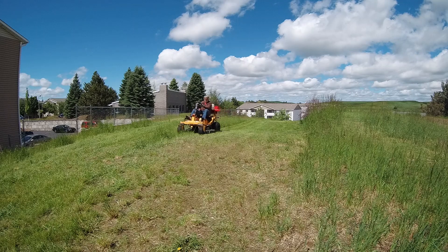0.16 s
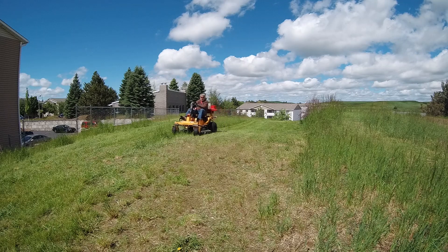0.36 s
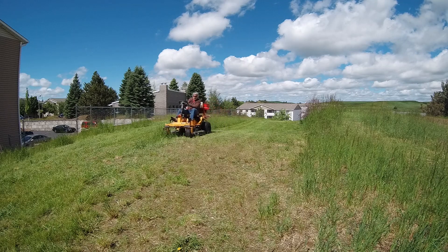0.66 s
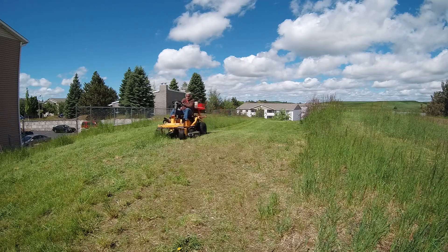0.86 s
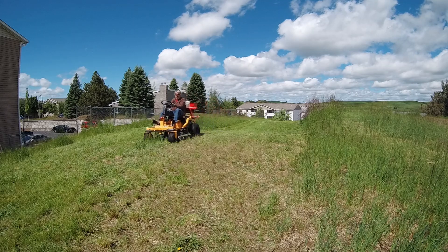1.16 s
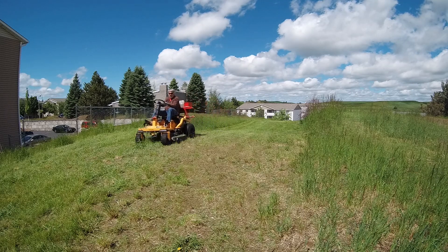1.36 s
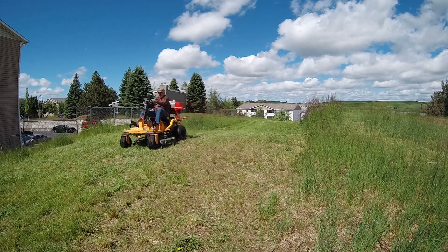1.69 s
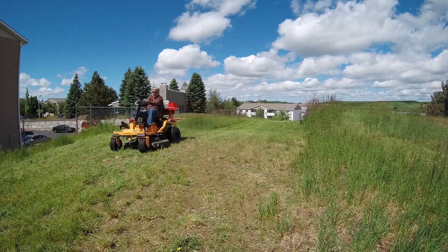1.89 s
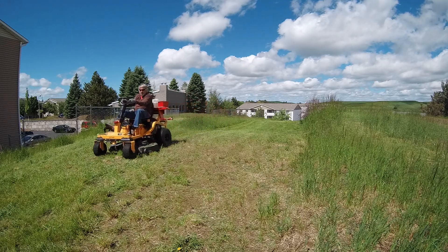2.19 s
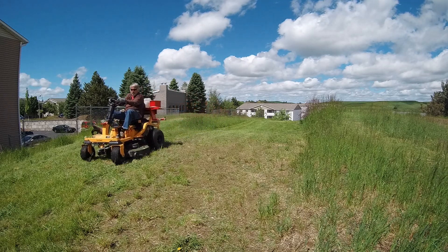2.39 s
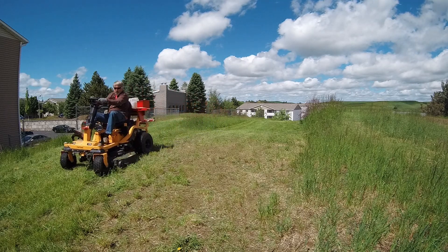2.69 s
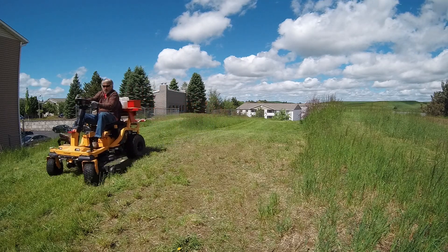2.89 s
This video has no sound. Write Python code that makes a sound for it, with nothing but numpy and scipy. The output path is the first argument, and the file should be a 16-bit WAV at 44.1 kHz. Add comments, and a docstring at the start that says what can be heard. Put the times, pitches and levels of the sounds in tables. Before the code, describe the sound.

A ride-on mower drones and roars steadily, growing louder as it approaches across tall grass.

```python
"""A field of tall grass: a ride-on mower comes from far off towards a stereo microphone.
Blades thump the air under the deck as partials of the blade rate; a twin engine drones as partials of
its cycle. Air roars in a puff per blade pass and cut grass hisses and patters, both from shaped noise.
Stalks and grit crack and knock on the deck now and then: short rings, each with a rough rattle."""
import sys
import numpy as np
from scipy import signal
from scipy.fft import rfft, irfft, next_fast_len
from scipy.io import wavfile
from scipy.ndimage import uniform_filter1d

SR = 44100
rng = np.random.default_rng(int(sys.argv[2]) if len(sys.argv) > 2 else 0)


def wav_out(sig):
    """Save sig, one row per channel (or a flat mono array), as 16-bit PCM at SR to the path in sys.argv[1]."""
    wavfile.write(sys.argv[1], SR, np.round(np.clip(np.atleast_2d(sig).T, -1, 1) * 32767).astype(np.int16))


def voltage_ratio(level):
    """Linear amplitude factor for a level in decibels (scalar or array-like)."""
    return 10 ** (np.asarray(level, float) / 20)


N = 134505  # samples, about 3.05 s

# Blade speed, sagging in thick grass and rising as the load eases: time_s, passes_per_s
BLADE_RATE = [(0, 86.1), (.4, 86.4), (.9, 87.8), (1.15, 87.5), (1.4, 86.5), (1.7, 87.3), (2.3, 88.3),
              (2.45, 89.1), (2.8, 90.0), (3.05, 90.3)]
# Partials of the blade thump: multiple_of_blade_rate, relative_level_db
BLADE_PARTIALS = [(2, 4.5), (3, 4), (4, -4.5), (5, -3), (6, -4), (7, -7), (8, -8.5), (9, -16.5), (10, -21)]
# Lowest blade partial, and how rough the upper ones are: time_s, level_db, roughness (a plain factor)
BLADE_FUNDAMENTAL = [(0, -59, 1.54), (.6, -53.5, 1.08), (1.3, -55, 1.09), (1.6, -54, 0.8), (2.3, -49, 0.51),
                     (3.05, -49.5, 0.68)]
# Deck sounds before the fixed offsets in air_roar() and grass_hiss():
# time_s, low_blade_db, upper_blade_db, roar_db, hiss_db
DECK_LEVELS = [(0, -49, -38, -34.5, -56), (.15, -46, -37.5, -33.5, -57), (.4, -47.5, -35, -33.5, -55.5),
               (.65, -45, -34, -31.5, -56.5), (.9, -42.5, -34.5, -31.5, -55),
               (1.16, -45, -33.5, -30.5, -54), (1.24, -40.5, -32.5, -27.5, -52.5),
               (1.39, -44.5, -31, -29.5, -51), (1.51, -46.5, -32, -29.5, -51.5),
               (1.86, -46.5, -30, -28.5, -52.5), (2.15, -47, -27.5, -26, -51), (2.33, -43, -27, -26.5, -52),
               (2.45, -41.5, -26.5, -25, -51.5), (2.7, -40, -27, -26.5, -52.5),
               (2.95, -43, -23, -25.5, -51.5), (3.05, -42.5, -25.5, -25.5, -51)]
# Engine speed: time_s, cycles_per_s
ENGINE_RATE = [(0, 25.1), (.7, 25.2), (1.0, 25.4), (1.5, 25.35), (2.2, 25.65), (2.8, 25.95), (3.05, 26.0)]
# Engine partials, some favoured by uneven twin firing: multiple_of_engine_cycle, relative_level_db
ENGINE_PARTIALS = [(4, -22), (5, -7), (6, -10.5), (8, -2.5), (9, -8.5), (11, -9.5), (12, -16.5), (13, -9),
                   (16, -7.5)]
# Engine drone gain: time_s, level_db
ENGINE_LEVEL = [(0, -44.5), (1, -46), (1.8, -43.5), (2.5, -43.5), (3.05, -42)]
# Spectrum shape of the roar of air and grass under the deck: frequency_hz, relative_level_db
ROAR_SHAPE = [(30, -61), (60, -40.5), (110, -26.5), (190, -13.5), (300, -8), (500, -1.5), (700, -1),
              (1050, -1.5), (1600, -11.5), (2500, -24.5), (3300, -43), (5500, -120)]
# Spectrum shape of the grass hiss: frequency_hz, relative_level_db
HISS_SHAPE = [(880, -35.5), (1500, -2.5), (2680, -9.5), (3690, -19.5), (4380, -19.5), (4990, -24.5),
              (5920, -38), (6860, -33.5), (7700, -47), (9200, -55), (9900, -71), (12500, -89.5)]
# Gain on the separate hiss noise that forms the side signal, strong in two bands: frequency_hz, gain_db
HISS_SIDE = [(2700, -72), (3050, -9), (4100, -3), (4400, -31), (5600, -35), (5900, -3.5), (6400, -25),
             (10000, -34.5)]
# Stalks and grit snapping on the deck: time_s, body_level_db, body_pitch_hz, top_level_db, top_pitch_hz
CRACKS = [(1.198, -47, 4970, -62, 7380), (1.206, -52, 4500, -61, 8000), (1.217, -48, 5200, -59, 7200),
          (1.2288, -43, 5500, -53, 7100), (1.23, -42, 3580, -49, 6600), (1.241, -37, 4570, -52, 6800),
          (1.254, -39, 4000, -60, 7640), (1.261, -37.5, 4460, -58, 7540), (1.277, -40, 4400, -60, 6800),
          (1.334, -30.5, 3670, -56.5, 7970), (2.11, -39, 4600, -64, 7500), (2.21, -39, 3700, -60.5, 7940),
          (2.3195, -40, 4800, -58, 8300), (2.338, -45, 4200, -58.5, 8620), (2.399, -37, 4300, -63, 8150),
          (2.466, -47.5, 5200, -65, 8560), (2.6315, -47, 3980, -57.5, 9400),
          (2.9014, -28.5, 4400, -52, 6600), (2.903, -29, 4200, -51, 6800)]
# Duller knocks of thick stalks: time_s, level_db, pitch_hz
KNOCKS = [(1.229, -31, 1720), (1.253, -29, 2300), (1.3203, -29.5, 2780), (1.334, -37, 2500),
          (1.3665, -26.5, 1910), (1.3663, -27, 2600)]
# Treble of the hits in the side signal: frequency_hz, gain_db
HIT_SIDE = [(2700, -69.5), (3100, 0), (5000, -3.0), (12000, -9.5)]

LOW_PARTIALS = 2  # the first rows of BLADE_PARTIALS, which stay steady
BRIGHT_FROM, BRIGHT_DB = 7, 10.5  # partials from this one up: dB gained per unit of roughness above 1
NEAR_TILT_DB_PER_S = 0.5  # partials above the 5th gain this, the 4th loses it
PASS_SCATTER_DB, PASS_JITTER = 1.61, 0.0073  # level and timing (share of a pass), at roughness 1
THUMP_LEAN, THUMP_SMEAR = 0.15, 0.016  # turns of phase: lopsided thump, drawn out by the deck
WOBBLE_LIMIT = 6  # phase wobble grows no further above this multiple
PUFF_DEPTH, PUFF_WIDTH = 0.4, 0.18  # share of the roar that is puffed; decay as share of a pass
PATTER_PER_S, PATTER_DB, PATTER_SPREAD_DB = 600, -10, 2.5  # level is against the hiss noise
SHOWER_S, SHOWER_WIDTH_S, SHOWER_DB = 1.25, 0.055, 10  # a swell of the patter
HISS_TOP_DB_PER_S = -1.4  # slope of the gain above 5.5 kHz
BODY_CYCLES, TOP_CYCLES, KNOCK_CYCLES = 0.83, 0.9, 1.3  # half-lengths of the rings
RATTLE_DB, RATTLE_S = -18, 0.0027  # gain and decay time of the deck rattle
HIT_SIDE_DB = -3  # added to HIT_SIDE


def curve(table, column):
    """One column of a time table, per sample."""
    rows = np.array(table)
    return np.interp(np.arange(N) / SR, rows[:, 0], rows[:, column])


def unit(x):
    """Scale to rms 1."""
    return x / np.sqrt(np.mean(x ** 2))


def colour(x, table):
    """Shape a spectrum by frequency_hz, gain_db points on a log frequency scale."""
    rows, size = np.array(table), next_fast_len(N)
    hz = np.arange(size // 2 + 1) * SR / size + 1
    gain_db = np.interp(np.log(hz), np.log(rows[:, 0]), rows[:, 1])
    return irfft(rfft(x, size) * voltage_ratio(gain_db), size)[:N]


def walk(rate):
    """Random levels held 1 / rate s and smoothed twice; rms 1."""
    hold = max(int(SR / rate), 1)
    steps = np.repeat(rng.standard_normal(N // hold + 1), hold)
    smooth = uniform_filter1d(uniform_filter1d(steps, hold), hold)
    return unit(smooth[:N])


def hum(turns, partials, waver_db, wobble, rate, aligned):
    """Partials of a rotation, higher ones less steady in level and phase; aligned phases make a thump."""
    total = np.zeros(N)
    for k, db in partials:
        level = np.sqrt(2) * voltage_ratio(db + waver_db * k * walk(rate))
        wander = wobble * min(k, WOBBLE_LIMIT) * walk(rate)  # radians
        offset = THUMP_LEAN + THUMP_SMEAR * (k - 5) ** 2 if aligned else rng.random()
        total += level * np.cos(wander + 2 * np.pi * (k * turns + offset))
    return total


def blades(turns):
    """Each blade pass thumps the air: steady low partials, upper ones scattered pass by pass."""
    size, late = rng.standard_normal((400, 2))[np.round(turns).astype(int)].T
    size, late = uniform_filter1d(size, size=100), uniform_filter1d(late, size=100)
    rough = curve(BLADE_FUNDAMENTAL, column=2)
    tilt_db = NEAR_TILT_DB_PER_S * (np.arange(N) - N / 2) / SR
    upper = []
    for k, db in BLADE_PARTIALS[LOW_PARTIALS:]:
        bright_db = BRIGHT_DB * (rough - 1) if k >= BRIGHT_FROM else 0
        upper.append((k, db + min(k - 5, 1) * tilt_db + bright_db))
    first = np.sqrt(2) * np.cos(2 * np.pi * turns) * voltage_ratio(curve(BLADE_FUNDAMENTAL, column=1))
    low = hum(turns, BLADE_PARTIALS[:LOW_PARTIALS], waver_db=0.37, wobble=0.027, rate=24.0, aligned=True)
    uneven_turns = turns + PASS_JITTER * late * rough
    high = hum(uneven_turns, upper, waver_db=0.31 * rough, wobble=0.15 * rough, rate=15.0, aligned=True)
    low_gain = voltage_ratio(curve(DECK_LEVELS, column=1))
    high_gain = voltage_ratio(curve(DECK_LEVELS, column=2) + PASS_SCATTER_DB * size * rough)
    return first + low * low_gain + high * high_gain


def engine():
    """Drone of the twin's exhaust: partials of the engine cycle with unrelated phases."""
    cycles = np.cumsum(curve(ENGINE_RATE, column=1)) / SR
    drone = hum(cycles, ENGINE_PARTIALS, waver_db=0.2162, wobble=0.06, rate=14.0, aligned=False)
    return drone * voltage_ratio(curve(ENGINE_LEVEL, column=1))


def air_roar(turns):
    """Turbulent air under the deck: noise that jumps up at each blade pass and dies back."""
    phase = (turns + 0.066) % 1
    puff = 1 - PUFF_DEPTH * (1 - np.exp(-phase / PUFF_WIDTH))
    noise = rng.standard_normal(N) * puff * voltage_ratio(0.5 * walk(29.92))
    return unit(colour(noise, ROAR_SHAPE)) * voltage_ratio(curve(DECK_LEVELS, column=3) + 0.5)


def grass_patter():
    """Bits of cut grass: random single-sample ticks of uneven size, with one brief shower."""
    struck = rng.random(N) < PATTER_PER_S / SR
    grains = struck * rng.standard_normal(N) * voltage_ratio(PATTER_SPREAD_DB * rng.exponential(size=N))
    from_shower = (np.arange(N) / SR - SHOWER_S) / SHOWER_WIDTH_S
    shower_db = SHOWER_DB * np.exp(-0.5 * from_shower ** 2)
    return voltage_ratio(PATTER_DB + shower_db) * unit(grains)


def grass_hiss():
    """Hiss and patter of cut grass as shaped noise; separate noise widens the treble; mid and side."""
    hiss = colour(rng.standard_normal(N) * voltage_ratio(1.1 * walk(14.0)) + grass_patter(), HISS_SHAPE)
    top = signal.sosfilt(signal.butter(4, 5500, "high", fs=SR, output="sos"), hiss)
    top_gain = voltage_ratio(HISS_TOP_DB_PER_S * (np.arange(N) - N / 2) / SR)
    hiss = hiss + top * (top_gain - 1)
    gain = voltage_ratio(curve(DECK_LEVELS, column=4) + 10.5) / np.std(hiss)
    side = colour(colour(rng.standard_normal(N), HISS_SHAPE), HISS_SIDE)
    return gain * hiss, gain * side


def air(turns):
    """Moving air and cut grass together: the roar in the middle, the hiss wide; mid and side."""
    hiss, side = grass_hiss()
    return air_roar(turns) + hiss, side


def rings(times_s, levels_db, pitches_hz, half_cycles):
    """Each hit swells and dies within a few cycles of its own pitch, under a bell-shaped envelope."""
    out, lag = np.zeros(N), np.arange(-300, 300)
    for s, db, hz, turn in zip(times_s, levels_db, pitches_hz, rng.random(len(times_s))):
        cycle = lag / SR * hz
        envelope = np.exp(-0.5 * (cycle / half_cycles) ** 2)
        out[int(s * SR) + lag] += voltage_ratio(db) * envelope * np.cos(2 * np.pi * (cycle + turn))
    return out


def cracks():
    """Stalks and grit on steel: snaps with a body and a top, duller knocks, a decaying noise rattle."""
    start_s, body_db, body_hz, top_db, top_hz = np.array(CRACKS).T
    bodies = rings(start_s, body_db, body_hz, BODY_CYCLES)
    tops = rings(start_s, top_db, top_hz, TOP_CYCLES)
    knock_s, knock_db, knock_hz = np.array(KNOCKS).T
    hits = bodies + tops + rings(knock_s, knock_db, knock_hz, KNOCK_CYCLES)
    rattle = rng.standard_normal(size=600) * np.exp(-np.arange(600) / SR / RATTLE_S)
    return hits + voltage_ratio(RATTLE_DB) * signal.fftconvolve(hits, rattle)[:N]


def scene():
    """Blades, engine and roar sit in the middle; only the treble of hiss and hits is wide."""
    turns = np.cumsum(curve(BLADE_RATE, column=1)) / SR  # blade passes so far
    mid, side = air(turns)
    hits = cracks()
    mid = mid + blades(turns) + engine() + hits
    late_hits = np.roll(hits, shift=3)  # samples
    side = side + voltage_ratio(HIT_SIDE_DB) * colour(late_hits, HIT_SIDE)
    return np.array([mid + side, mid - side])


def top_cut(x):
    """Nothing passes above the cut-off."""
    return signal.sosfilt(signal.butter(12, 11800, fs=SR, output="sos"), x)


def record(dry):
    """The finished stereo mix, with a ramp of a few ms at both ends."""
    to_nearest_end = np.minimum(np.arange(N), np.arange(N)[::-1])
    ramp = np.clip(to_nearest_end / 150, 0, 1)
    mix = dry * ramp
    return top_cut(mix)


dry = scene()
out = record(dry)
wav_out(out)
```